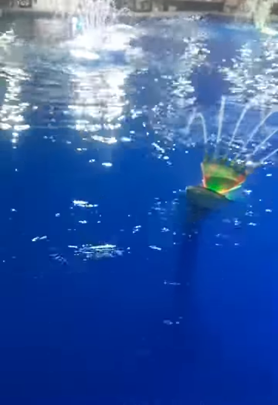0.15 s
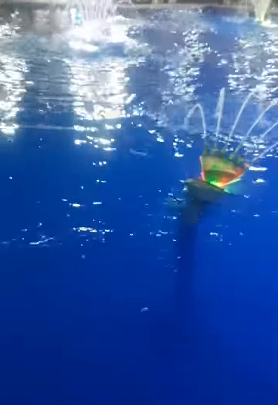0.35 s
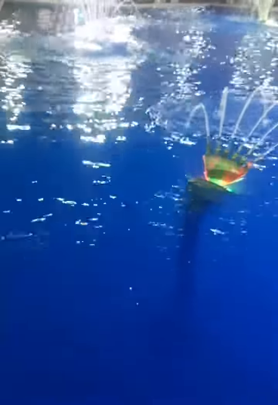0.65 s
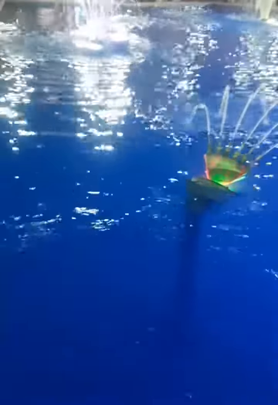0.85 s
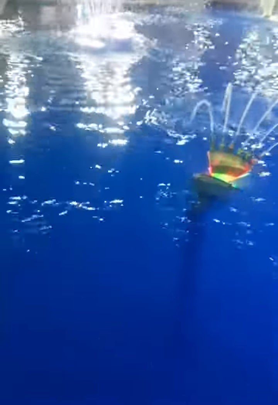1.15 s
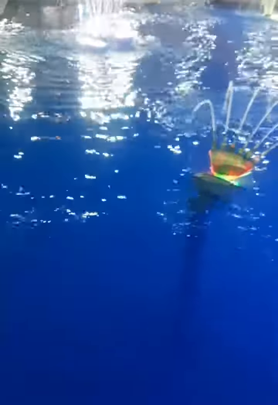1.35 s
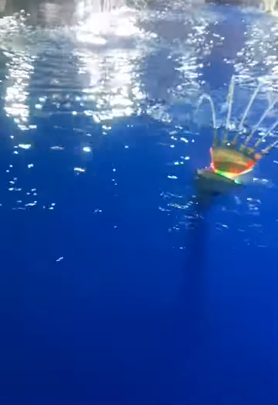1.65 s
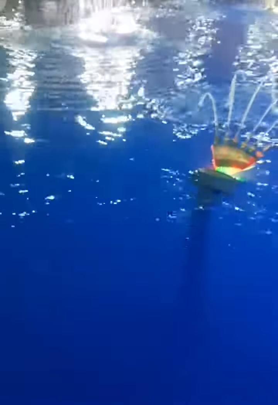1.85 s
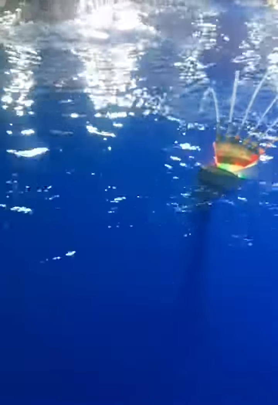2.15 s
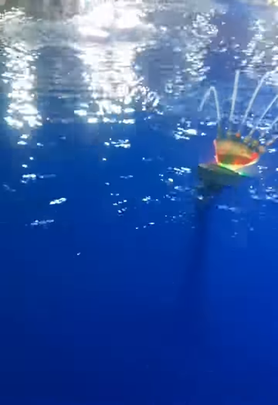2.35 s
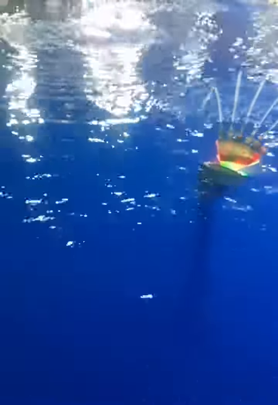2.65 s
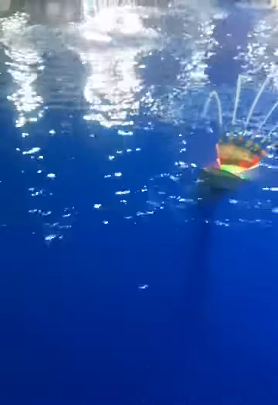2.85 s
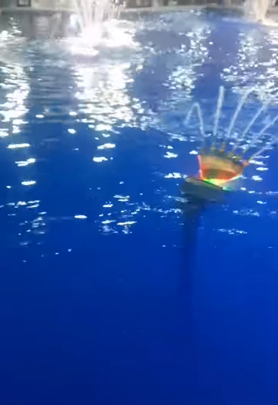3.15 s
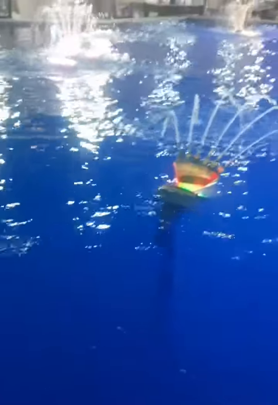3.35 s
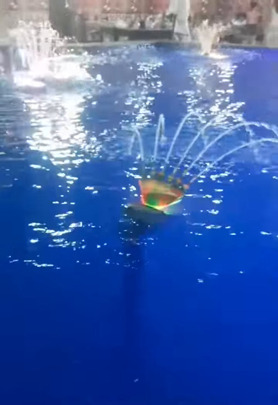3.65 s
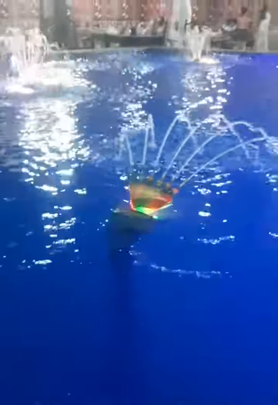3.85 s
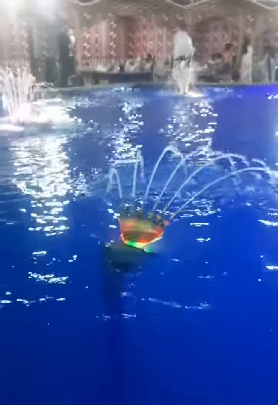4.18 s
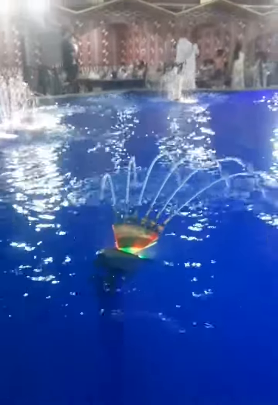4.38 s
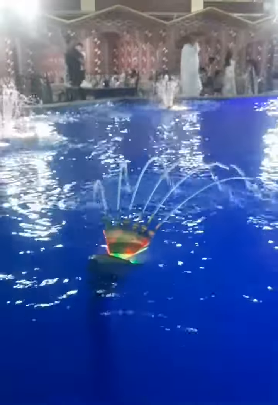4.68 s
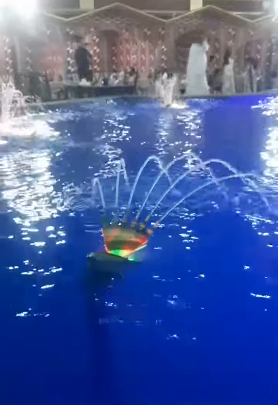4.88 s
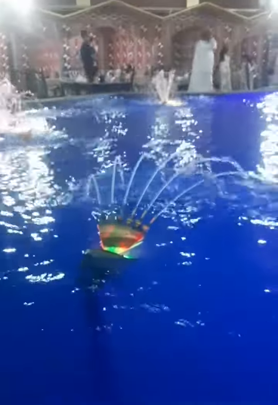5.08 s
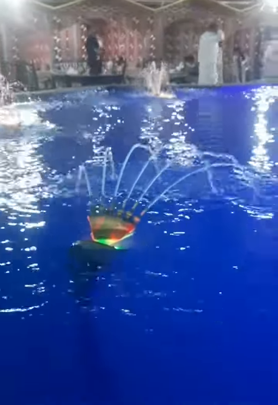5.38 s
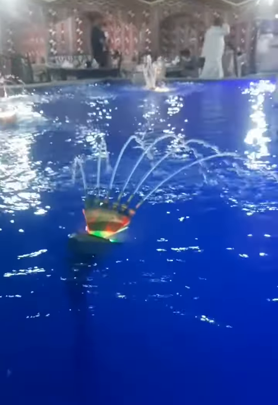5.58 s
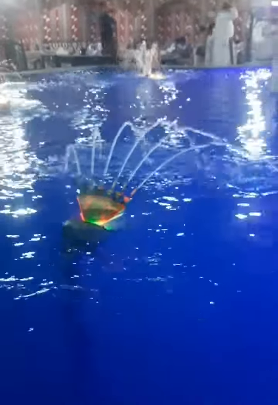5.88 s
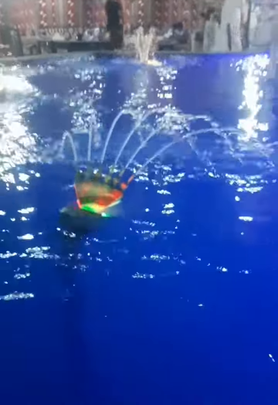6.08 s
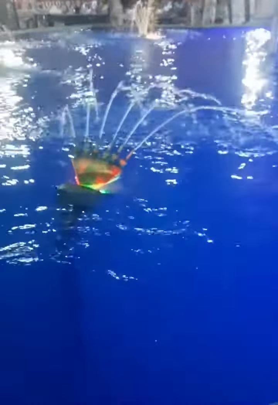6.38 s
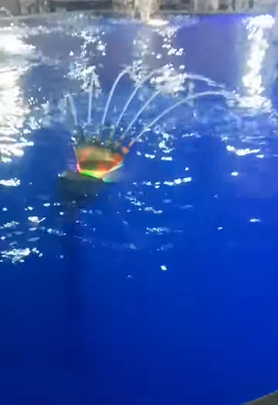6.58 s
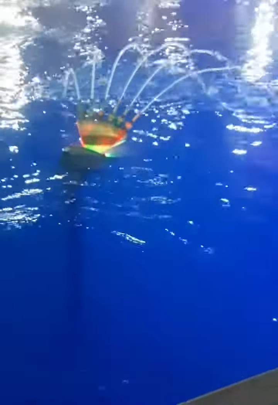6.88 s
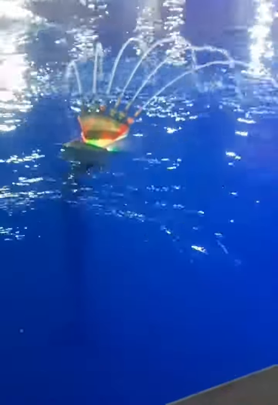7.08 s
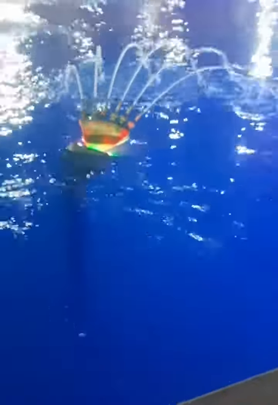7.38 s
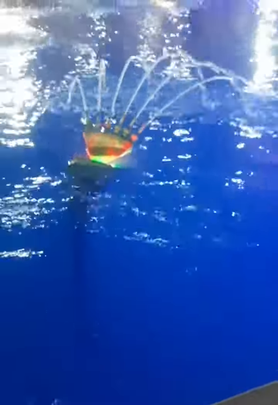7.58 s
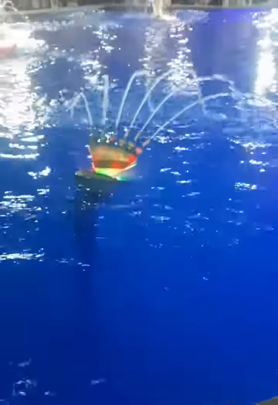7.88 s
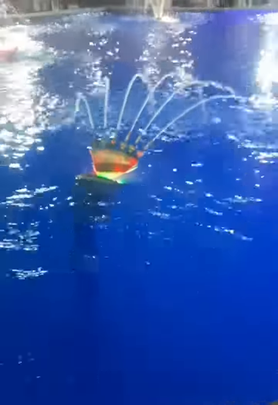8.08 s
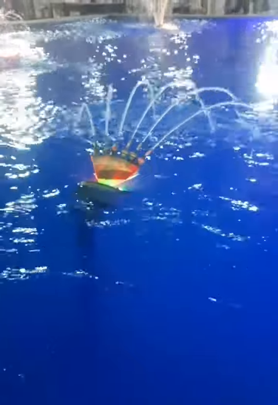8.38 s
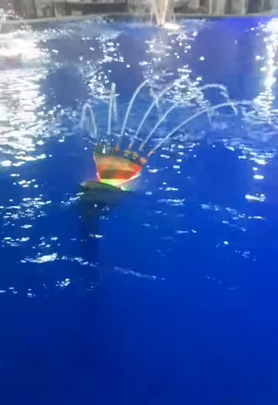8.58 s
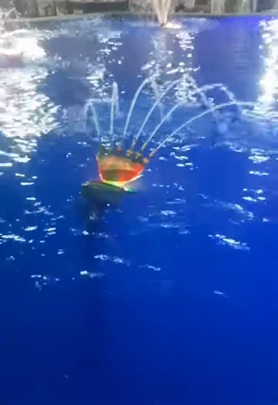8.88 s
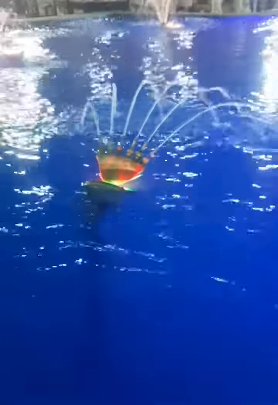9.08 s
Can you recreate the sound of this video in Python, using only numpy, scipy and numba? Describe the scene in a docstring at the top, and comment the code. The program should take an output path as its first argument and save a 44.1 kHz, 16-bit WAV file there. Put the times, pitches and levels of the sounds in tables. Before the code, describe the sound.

Close bubbling fountain water over a steady distant wash, thinning after five seconds, with faint quick chirps, soft hum and one dull late thud.

```python
"""Thin fountain jets fall into a pool a few metres away, outdoors at night, with a humming pump and a far wash.
From the start, drops tick on the surface, and trapped bubbles ring and rise in pitch in a full babble.
Small birds chirp faintly between the courtyard walls, each stroke a quick sweep with its echo.
After about five seconds the babble thins out, and a dip in the treble slides lower.
Near the end comes one dull, soft thud, made of low noise in a short swell."""
import sys
import numpy as np
from scipy import signal
from scipy.fft import rfft, irfft
from scipy.io import wavfile
from scipy.ndimage import uniform_filter1d
from numba import njit

SR = 44100
rng = np.random.default_rng(int(sys.argv[2]) if len(sys.argv) > 2 else 0)


def transcribe(signal):
    """Save signal, clipped to [-1, 1], as a 16-bit WAV file at the path in sys.argv[1]."""
    frames = np.atleast_2d(signal).T
    limited = np.clip(frames, -1, 1)
    pcm = np.round(limited * 32767).astype(np.int16)
    wavfile.write(sys.argv[1], SR, pcm)


N = 407484
T = np.arange(N) / SR  # time axis [s]

# Colour of the far fountains and the town: freq_hz [Hz], relative_level_db [dB per Hz]
WASH_COLOUR = [(20, -51), (50, -20), (160, -18.5), (330, -15), (620, -12.5), (850, -15.5), (1400, 0),
               (2200, -8), (3500, -17.5), (4500, -18.5), (6000, -18.5), (8500, -47), (12500, -40),
               (15500, -48)]
# Pump hum over time, before its trim and waver: time_s [s], relative_level_db [dB]
PUMP_LEVEL = [(0.0, -59), (1.46, -52), (3.05, -58.5), (3.2, -52), (3.6, -48), (4.05, -57.5), (4.35, -54),
              (4.73, -62.5), (5.56, -54), (5.81, -60.5), (7.41, -59), (7.49, -65.5), (8.47, -58),
              (8.52, -68.5), (9.24, -60)]
# Octave of the pump hum over time: time_s [s], level_db [dB]
PUMP_OCTAVE_LEVEL = [(0, -60), (.62, -68), (2.49, -54.5), (3.14, -70), (3.57, -54), (3.8, -61),
                     (4.9, -56.5), (5.4, -67), (5.9, -54), (6.3, -64.5), (7.1, -55), (7.6, -64),
                     (9.24, -62)]
# Strokes of the bird chirps, before voice and mix trims:
# start_s [s], length_s [s], first_hz [Hz], middle_hz [Hz], last_hz [Hz], relative_peak_db [dB]
CHIRP_STROKES = [(0.32, 0.029, 3670, 4870, 5130, -33), (0.341, 0.03, 4320, 4150, 3800, -32),
                 (1.15, 0.058, 3800, 4540, 3970, -41), (1.532, .023, 3560, 4850, 4950, -31),
                 (1.555, 0.02, 4350, 3980, 4000, -32), (1.594, 0.035, 4200, 3550, 3850, -36),
                 (1.945, 0.028, 3780, 4030, 4480, -40), (2.61, 0.043, 4750, 4140, 3780, -42),
                 (3.326, 0.041, 4620, 4500, 3460, -34.5), (4.655, 0.027, 4700, 4260, 3650, -33),
                 (6.675, 0.013, 3620, 4900, 6500, -31), (6.766, .035, 4880, 5260, 5300, -40),
                 (6.837, 0.014, 5500, 4750, 4100, -35), (6.892, 0.029, 3680, 3950, 4300, -37),
                 (6.95, .026, 4200, 4580, 4840, -33), (8.231, 0.025, 4950, 4240, 3600, -34),
                 (8.26, 0.038, 3680, 4000, 4700, -36), (8.324, 0.021, 3720, 3920, 4350, -40),
                 (8.384, 0.04, 4520, 4800, 5150, -37), (8.51, 0.061, 4670, 5170, 4830, -35),
                 (8.89, 0.035, 4020, 4730, 4200, -36), (8.918, 0.034, 4200, 3760, 4240, -35),
                 (8.95, .033, 4550, 4550, 3570, -50)]
# Strength of the jets' bubbles over time: time_s [s], relative_level_db [dB]
BABBLE_LEVEL = [(0, -21.5), (1.3, -21.5), (1.55, -19), (2.03, -19.5), (2.5, -21.5), (3.1, -22.5),
                (3.4, -21.5), (4.35, -20.5), (4.95, -22.5), (5.3, -25.5), (5.95, -29.5), (6.55, -27.5),
                (7.05, -31.5), (7.58, -25), (7.74, -31.5), (8.7, -32), (8.85, -26.5), (9.1, -36)]
# Colour of the jets' bubbles: freq_hz [Hz], relative_level_db [dB per Hz]
BUBBLE_COLOUR = [(160, -27), (280, -21), (318, -25.5), (546, -13), (862, -13.5), (1310, -2), (2120, -5),
                 (2620, -16.5), (2980, -13), (3350, -19.5), (4600, -30), (5980, -54), (10100, -120)]
# Colour of the finest bubbles: freq_hz [Hz], relative_level_db [dB per Hz]
FIZZ_COLOUR = [(3800, -10.5), (4700, -11), (5300, -1.5), (5800, 4.5), (6500, -0.5), (7400, -12.5),
               (8600, -25.5)]
# Colour of the drop impacts: freq_hz [Hz], relative_level_db [dB per Hz]
SPRAY_COLOUR = [(1500, -48), (3000, 4), (4500, -2.5), (5750, -14), (6600, -1), (7500, -3.5), (8500, -8.5),
                (10300, -13.5), (11500, -25.5), (13200, -27), (15500, -63)]
# Strength of spray and fizz over time: time_s [s], relative_level_db [dB]
SPRAY_LEVEL_CURVE = [(0, -38), (1.4, -39.5), (1.9, -40), (2.36, -34), (2.6, -41.5), (3.1, -40.5),
                     (3.7, -39), (4.2, -36.5), (4.6, -40), (5.1, -35), (5.4, -42.5), (5.9, -42), (6.2, -41),
                     (7.55, -39.5), (7.9, -43.5), (8.6, -41), (9.24, -45.5)]
# Moments when spray and fizz thin out: middle_s [s], length_s [s], depth_db [dB]
SPRAY_LULLS = [(0.52, 0.025, 18), (1.4, 0.033, 17), (2.516, 0.034, 15), (3.4, 0.056, 17),
               (4.628, 0.045, 26), (4.892, 0.031, 6), (8.718, 0.033, 26)]
# Drops that smack the surface without trapping a bubble: start_s [s], centre_hz [Hz], peak_db [dB]
SMACK_DROPS = [(.544, 5830, -14.5), (.775, 6300, -10), (.917, 1830, -8), (1.242, 5900, -11.5),
               (1.325, 5650, -11.5), (1.369, 5800, -6.5), (1.613, 5620, -7), (1.73, 1870, -11),
               (1.822, 6160, -7), (1.909, 2000, -12), (2.028, 5970, -8), (2.231, 2750, -14),
               (2.547, 3240, -5.5), (3.176, 5620, -8), (4.274, 2050, -7), (4.411, 6400, -5),
               (4.747, 6100, -7), (4.858, 2560, -8), (5.083, 2570, -5.5), (5.101, 5700, -1.5),
               (5.119, 2600, -2), (5.771, 5500, -16), (5.921, 6240, -16), (6.004, 2950, -21),
               (6.232, 1980, -14.5), (6.354, 3020, -13.5), (6.567, 5900, -8.5), (6.665, 3170, -14),
               (6.713, 5850, -9), (6.882, 3470, -13.5), (6.899, 2480, -14), (7.309, 1550, -12),
               (7.535, 3400, -15), (7.557, 2210, -8.5), (7.998, 3100, -19), (8.029, 1960, -12.5),
               (8.369, 5900, -13.5), (8.625, 1670, -17), (8.783, 6220, -7), (8.974, 5650, -9.5),
               (9.103, 5700, -15)]
# Loud bubbles; the rise is reached after one length:
# start_s [s], pitch_hz [Hz], rise_oct [octaves], length_s [s], peak_db [dB]
LOUD_BUBBLES = [ (.046, 2810, 0.18, 0.0069, -6), (.065, 1654, 0.056, 0.012, -7),
                (.087, 3400, 0.2, 0.0054, -15), (.126, 2450, 0.23, .006, -20),
                (.34, 1295, 0.067, 0.012, -9), (.356, 488, 0, 0.022, -23), (.645, 670, 0.11, 0.034, -25),
                (.76, 1380, 0, 0.015, -9.5), (.914, 1390, 0.19, 0.01, -5), (1.086, 950, 0.21, 0.015, -16.5),
                (1.482, 1250, 0.12, .01, -12), (1.522, 1860, 0, 0.0095, -7), (1.823, 2110, 0, 0.0072, -6),
                (1.892, 1805, 0.17, 0.0066, -6.5), (1.995, 1062, 0.61, 0.048, -12.5),
                (2.046, 610, 0.94, 0.026, -25.5), (2.127, 1230, 0.29, 0.024, -15.5),
                (2.232, 2600, .2, 0.0038, -10), (2.595, 2040, 0.21, 0.0058, -7),
                (2.89, 1027, 0.16, 0.017, -14.5), (3.147, 767, 0.14, 0.033, -24.5),
                (3.361, 1310, 0.17, 0.027, -10.5), (3.403, 1750, 0.06, 0.0067, -5),
                (3.485, 1310, 0, 0.013, -9.5), (3.7, 3005, 0.036, 0.01, -11),
                (3.755, 770, 0.98, 0.03, -12.5), (3.857, 896, 0.96, 0.033, -16.5),
                (4.023, 1046, 0.7, 0.022, -7), (4.179, 1590, 0.093, 0.011, -6.5),
                (4.196, 2430, 0.42, 0.0051, -13), (4.323, 532, 0.21, 0.035, -23),
                (4.4, 2180, 0.018, .007, -10.5), (4.456, 1324, 0.055, 0.017, -6.5),
                (4.457, 682, 0.59, 0.049, -19.5), (4.526, 1690, 0.058, 0.0049, -9.5),
                (4.535, 1474, 0.45, .016, -11.5), (4.546, 2010, 0.29, 0.0066, -18),
                (4.741, 767, 0.61, 0.037, -22.5), (4.856, 553, 0, 0.03, -22),
                (4.962, 1138, 0.98, 0.03, -12), (5.522, 1480, .08, 0.0049, -12),
                (5.798, 1950, 0, 0.0061, -16), (5.908, 2150, 0.091, .007, -21),
                (5.998, 1280, 0, 0.015, -19), (6.095, 2420, 0.098, 0.0072, -18.5),
                (6.115, 610, 0.089, .025, -31), (6.141, 1000, 0.87, .012, -21.5),
                (6.232, 950, 0.29, 0.011, -19), (6.237, 690, 0.026, .025, -31.5),
                (6.309, 2710, 0.032, 0.0069, -19), (6.397, 900, 0.08, .028, -30),
                (6.424, 3160, 0, 0.004, -14.5), (6.494, 1620, 0.51, 0.014, -9.5),
                (6.677, 1300, 0, 0.024, -16), (6.71, 1960, 0.2, .008, -16), (6.832, 1020, 0.95, 0.025, -24),
                (6.882, 2250, 0.17, 0.0034, -9), (7.17, 513, .1, 0.032, -33), (7.202, 3590, .05, .007, -19),
                (7.209, 957, 0.37, 0.027, -23), (7.313, 1094, 0.74, 0.024, -21),
                (7.315, 629, 0.089, 0.032, -29.5), (7.402, 1180, 0.26, 0.025, -22),
                (7.44, 1480, 0.2, 0.01, -9.5), (7.524, 670, 0.0076, 0.019, -27),
                (7.959, 2180, .1, 0.0073, -16.5), (8.013, 1490, 0, 0.0091, -9),
                (8.036, 1250, 0.073, .012, -16.5), (8.252, 1486, 0.46, 0.0077, -9),
                (8.255, 1685, 0.68, 0.012, -20), (8.343, 3130, 0, .006, -23), (8.355, 1700, 0, 0.01, -19),
                (8.466, 1430, 0, 0.012, -20), (8.77, 3540, 0.19, 0.0075, -13.5)]
# Treble dip that slides down as the microphone is turned: time_s [s], centre_hz [Hz]
SHADE_CENTRE = [(0, 9400), (4.3, 9430), (4.9, 8870), (7.4, 8360), (8.1, 7670), (9.24, 7400)]

PUMP_HZ = 129.4
BUMP_S, BUMP_DB = 8.71, -53  # a soft knock of the hand on the microphone: start, level before its swell
BUNCH_S = .014  # mean delay of a bubble within its bunch
# at this bubble level the gurgle has this level; it fades faster [dB per dB]
NEAR_DB, GURGLE_DB, GURGLE_SLOPE = -21, -35.5, 1.19
SMACK_CYCLES, SMACK_WIDTH = 7.5, .24  # cycles to decay to 1/e, octaves to either side
SLAP_DB, SLAP_SHARE, SLAP_TOP_HZ = -14, 0.91, 4500  # level under its bubble, decay per bubble length, top
TOP_HZ = 15400


def undb(db):
    """Decibels to gain."""
    return 10 ** (np.asarray(db) / 20)


def unit(x):
    """Scale to rms 1."""
    return x / np.sqrt(np.mean(x ** 2))


def curves(table):
    """Each column of a table, joined by straight lines in time."""
    time_s, *columns = np.transpose(table)
    return [np.interp(T, time_s, column) for column in columns]


def add(out, start_s, sound):
    """Mix a short sound in at its start time."""
    i = int(np.clip(start_s * SR, 0, N - 1))
    out[i:i + len(sound)] += sound[:N - i]


def walk(rate):
    """Slow chance: smoothed random levels at this rate per second, spread 1."""
    knots = rng.standard_normal(4096)
    path = np.interp(T * rate, np.arange(len(knots)), knots)
    return unit(uniform_filter1d(path, int(SR / rate / 2)))


def colour(x, points, size=2048):
    """Causal minimum-phase filter that follows (Hz, dB) points and falls 20 dB per octave beyond them."""
    hz, db = np.transpose(points)
    octave = np.log2(np.maximum(np.fft.rfftfreq(size, 1 / SR), 10))
    outside = np.abs(octave - np.clip(octave, np.log2(hz[0]), np.log2(hz[-1])))
    level_db = np.interp(octave, np.log2(hz), db) - 20 * outside
    # folding the cepstrum forward in time makes the filter causal
    cepstrum = irfft(np.log(undb(level_db)))
    cepstrum[1:size // 2] *= 2
    cepstrum[size // 2 + 1:] = 0
    return signal.oaconvolve(x, irfft(np.exp(rfft(cepstrum))))[:N]


def wash():
    """Far fountains blur into a rush of noise, its treble flickering at random."""
    noise = unit(colour(rng.standard_normal(N), WASH_COLOUR))
    rush = undb(-34.5 + 0.53 * walk(1.5)) * noise
    treble = signal.sosfiltfilt(signal.butter(3, 3200, "high", fs=SR, output="sos"), rush)
    flicker = undb(3.5 * np.tanh(walk(16)) - 1)
    return rush - treble + treble * flicker


def pump():
    """A hum that wavers in pitch and level, with its octave and a weak motor line."""
    hum_db, = curves(PUMP_LEVEL)
    octave_db, = curves(PUMP_OCTAVE_LEVEL)
    phase = 2 * np.pi * np.cumsum(PUMP_HZ * (1 + 0.00086 * walk(3.03))) / SR
    octave = undb(octave_db) * np.sin(2 * phase)
    motor = undb(-71.0 + 4.0 * walk(3.0)) * np.sin(2 * np.pi * 213.5 * T)
    hum = undb(hum_db + 0.6 + 1.2 * walk(4.9)) * np.sin(phase)
    return np.sqrt(2) * (hum + octave + motor)  # root two makes the levels rms


def bump():
    """A dull, short thud: low noise that swells and dies within moments."""
    age = np.maximum(T - BUMP_S, 0) / 0.012  # peaks 12 ms after the start
    thud = signal.sosfilt(signal.butter(3, [40, 95], "band", fs=SR, output="sos"), rng.standard_normal(N))
    return undb(BUMP_DB) * unit(thud) * age * np.exp(1 - age)


def birds(waver, broken_db):
    """Each chirp is a few quick strokes that sweep in pitch, with a wavering pitch and a broken level."""
    out = np.zeros(N)
    # the two halves of the syrinx sing at different pitches
    for ratio, voice_db in ((1, 4.5), (1.14, -4)):
        voice = np.zeros(N)
        drift = waver * walk(140)
        strokes = undb(voice_db + broken_db * walk(80))
        for start_s, length_s, *hz, db in CHIRP_STROKES:
            t = T[:int(length_s * SR)]
            sweep = np.polyval(np.polyfit([0, .5, 1], hz, 2), t / length_s)
            pitch = ratio * sweep * (1 + np.interp(start_s + t, T, drift))
            tone = np.sin(2 * np.pi * np.cumsum(pitch) / SR)
            add(voice, start_s, undb(db) * signal.windows.tukey(len(t), .5) * tone)
        out += voice * strokes
    return out


def courtyard(x, t60, gap_s):
    """Scattered reflections from the surrounding walls: sparse random echoes that die away after a gap."""
    t = T[:SR]
    hits = rng.standard_normal(SR) * (rng.random(SR) < .02)
    tail = hits * undb(-60 * t / t60) * (t > gap_s)
    return signal.oaconvolve(x, tail / np.linalg.norm(tail))[:N]


@njit
def ring(start, hz, rise, length, peak, swell, fade):
    """Bubbles swell, ring and die; a rising one climbs ever faster as it nears the surface."""
    out = np.zeros(N)
    for k in range(len(start)):
        first, n, phase = int(start[k] * SR), length[k] * SR, 0.
        for i in range(max(0, min(int(1.6 * n), N - first))):
            u = i / n  # age in bubble lengths
            climb = 1 + (2 ** rise[k] - 1) * u * (1 + u) / 2
            phase += 2 * np.pi * hz[k] * climb / SR
            shape = np.sin(np.pi / 2 * u / swell) if u < swell else np.exp(-fade * (u - swell) ** 3)
            out[first + i] += peak[k] * shape * np.sin(phase)
    return out


def sizes(chance, spread_db, limit):
    """Gains for many small drops and few large ones, up to the largest that a jet sheds."""
    return undb(-spread_db * np.log(chance + np.exp(-abs(limit))))


def bubbles(tone, count, order, lo_hz, hi_hz, cycles, rise, spread_db, limit):
    """A random swarm of bubbles, `order` of them to each bunch; higher ones tend to be briefer."""
    when, lag, pitch, life, glide, size = rng.random((count, 6)).T
    bunch_s = np.repeat(when[::order], order)[:count] * N / SR
    start = bunch_s - BUNCH_S * np.log(1 - lag)
    hz = lo_hz * (hi_hz / lo_hz) ** pitch
    length = cycles * 2 ** (2 * life - 1) / hz  # from half to twice the given cycles
    peak = hz * sizes(size, spread_db, limit)
    swarm = ring(start, hz, rise * glide, length, peak, swell=.04, fade=1.93)
    return unit(colour(swarm, tone))


def impacts(count, spread_db, limit, splat_s, clump_db):
    """Drops strike the surface in clumps; each is a sharp tick with a short splat of noise."""
    when, size = rng.random((count, 2)).T
    energy = np.bincount((when * N).astype(int), sizes(size, spread_db, limit) ** 2, N)
    decay = np.exp(-2 / (splat_s * SR))
    envelope = np.sqrt(signal.lfilter([1], [1, -decay], energy + 1e-12))
    splats = envelope * rng.standard_normal(N) * undb(clump_db * walk(30))
    return unit(colour(splats, SPRAY_COLOUR))


def jets():
    """The near jets break into drops: gurgles, rising bloops, babble, ringing glides, pings, fizz and spray."""
    babble_db, = curves(BABBLE_LEVEL)
    spray_db, = curves(SPRAY_LEVEL_CURVE)
    for middle_s, length_s, depth_db in SPRAY_LULLS:
        spray_db = spray_db - depth_db * np.exp(-np.square(2 * (T - middle_s) / length_s) ** 2)
    gurgle_db = GURGLE_DB + GURGLE_SLOPE * (babble_db - NEAR_DB)

    gurgle = bubbles(BUBBLE_COLOUR, count=2200, order=2, lo_hz=340, hi_hz=950,
                     cycles=11.5, rise=.18, spread_db=3, limit=2.7)
    bloops = bubbles(BUBBLE_COLOUR, count=170, order=1, lo_hz=749, hi_hz=1846,
                     cycles=22.1, rise=0.48, spread_db=6.5, limit=1.6)
    babble = bubbles(BUBBLE_COLOUR, count=7000, order=4, lo_hz=900, hi_hz=2700,
                     cycles=10, rise=.28, spread_db=3.4, limit=4.2)
    glides = bubbles(BUBBLE_COLOUR, count=1100, order=3, lo_hz=1150, hi_hz=2700,
                     cycles=24, rise=.55, spread_db=3.2, limit=2.8)
    pings = bubbles(BUBBLE_COLOUR, count=500, order=2, lo_hz=2280, hi_hz=3900,
                    cycles=16, rise=.08, spread_db=3, limit=3.8)
    fizz = bubbles(FIZZ_COLOUR, count=4800, order=5, lo_hz=5000, hi_hz=8000,
                   cycles=9, rise=.05, spread_db=3.4, limit=4)
    ticks = bubbles(FIZZ_COLOUR, count=300, order=2, lo_hz=5190, hi_hz=7200,
                    cycles=5, rise=.05, spread_db=4.5, limit=2.4)
    spray = impacts(count=1900, spread_db=6.5, limit=3.4, splat_s=.0011, clump_db=3.2)

    # the jets wobble, so their drops land in bunches
    surge = undb(1.04 * walk(28))
    flurry = undb(4.8 * np.tanh(walk(30)))
    sputter = undb(3.5 * np.tanh(walk(11)))
    middle = undb(-2.47) * babble + undb(-6.5) * glides + undb(-12.0) * bloops + undb(-13.5) * pings
    treble = flurry * (undb(2.5) * fizz + undb(-1.5) * ticks) + undb(-3) * sputter * spray
    return gurgle * undb(gurgle_db) + surge * undb(babble_db) * middle + undb(spray_db) * treble


def smacks(drops):
    """A drop hits flat: a burst of noise, higher and briefer the smaller the drop."""
    out, t = np.zeros(N), T[:SR // 25]
    noises = rng.standard_normal((len(drops), len(t)))
    for (start_s, hz, db), noise in zip(drops, noises):
        edges = [hz / 2 ** SMACK_WIDTH, hz * 2 ** SMACK_WIDTH]
        band = signal.butter(3, edges, "band", fs=SR, output="sos")
        burst = signal.sosfilt(band, noise * np.exp(-t * hz / SMACK_CYCLES))
        add(out, start_s, undb(db) * burst / np.abs(burst).max())
    return out


def plinks(drops):
    """Big drops slap the water and trap one loud bubble each, with its own pitch, rise and length."""
    start, hz, rise, length, db = np.array(drops, float).T.copy()
    slaps, t = np.zeros(N), T[:SR // 25]
    noises = rng.standard_normal((len(start), len(t)))
    for start_s, pitch, life, gain, noise in zip(start, hz, length, undb(db), noises):
        # the slap is as deep as the cavity that it opens, and as brief
        band = signal.butter(4, [.7 * pitch, 1.55 * pitch], "band", fs=SR, output="sos")
        slap = unit(signal.sosfilt(band, noise))
        add(slaps, start_s, gain * slap * np.exp(-t / (SLAP_SHARE * life)))
    slaps = signal.sosfilt(signal.butter(4, SLAP_TOP_HZ, fs=SR, output="sos"), slaps)
    rings = ring(start, hz, rise, length, undb(db), swell=0.14, fade=2.8)
    return rings + undb(SLAP_DB) * slaps


def scene():
    """Near water, far birds and the steady background, with echoes off the courtyard walls."""
    water = jets() + plinks(LOUD_BUBBLES) + smacks(SMACK_DROPS)
    chirps = birds(waver=.03, broken_db=3.5)
    # the birds are far off, so their echo is strong
    chirps = chirps + undb(-1) * courtyard(chirps, t60=.3, gap_s=.006)
    echoes = undb(-12) * courtyard(water, t60=0.4, gap_s=0.011)
    return (water + echoes + undb(-2) * chirps + wash() + pump() + bump())[None]


@njit
def notch(x, hz, width, depth):
    """State-variable dip with a moving centre and a width in Hz."""
    y, band, low = np.empty(len(x)), 0., 0.
    for i in range(len(x)):
        g, k = np.tan(np.pi * hz[i] / SR), width / hz[i]
        v = (band + g * (x[i] - low)) / (1 + g * (g + k))
        band, low = 2 * v - band, low + 2 * g * v
        y[i] = x[i] - depth * k * v
    return y


def record(dry):
    """The microphone shades part of the treble and cuts the top."""
    shaded = notch(dry[0], curves(SHADE_CENTRE)[0], 4700.0, 0.88)
    top_cut = signal.ellip(8, .2, 80, TOP_HZ, fs=SR, output="sos")
    return signal.sosfilt(top_cut, shaded)[None]


dry = scene()
out = record(dry)
transcribe(out)
```